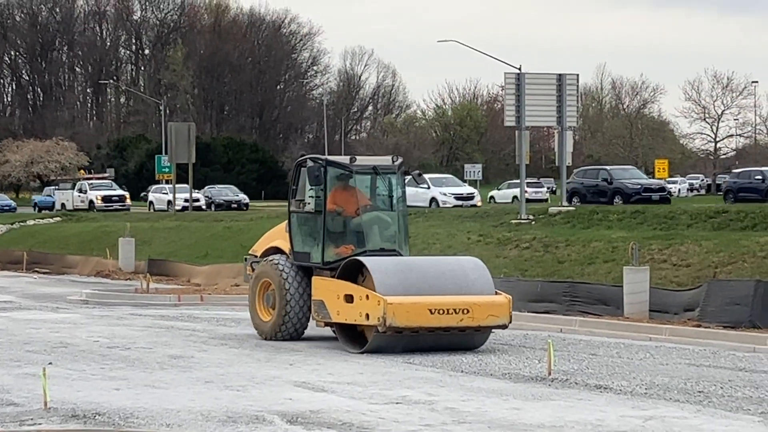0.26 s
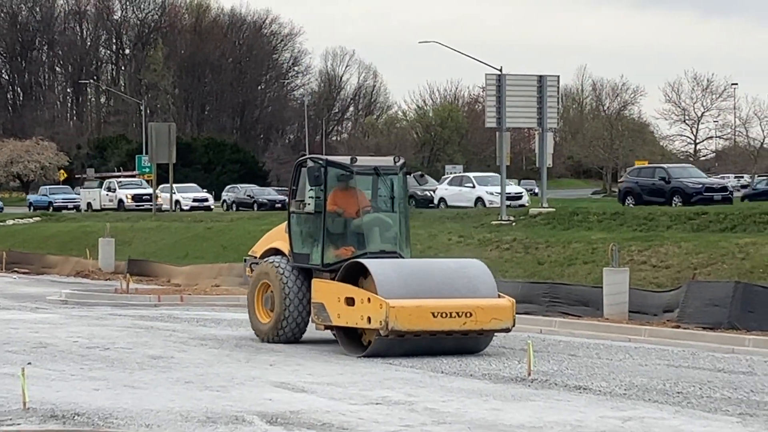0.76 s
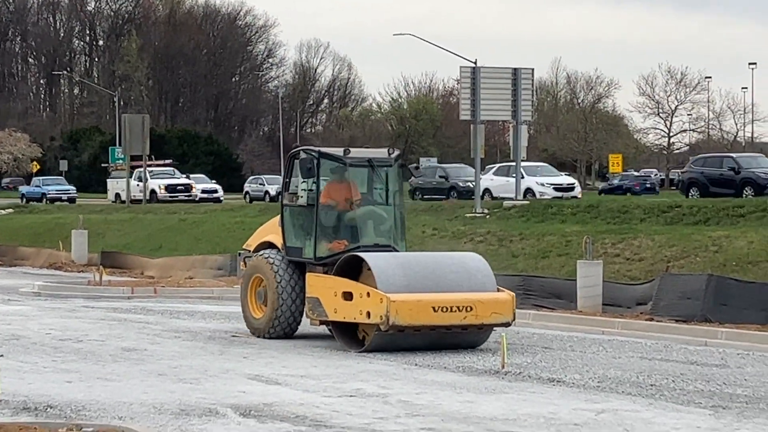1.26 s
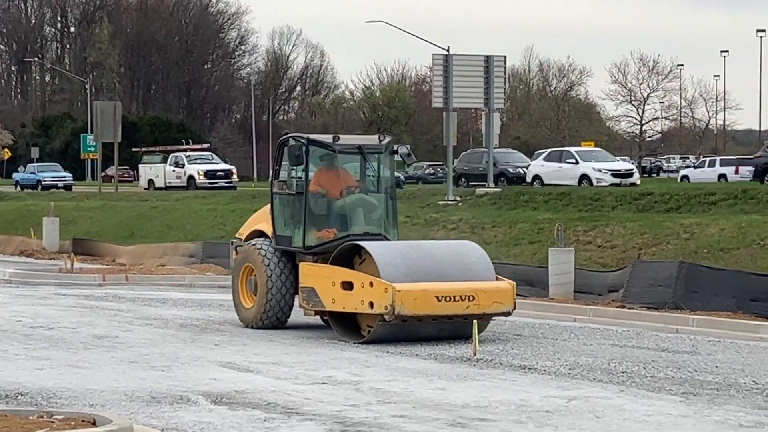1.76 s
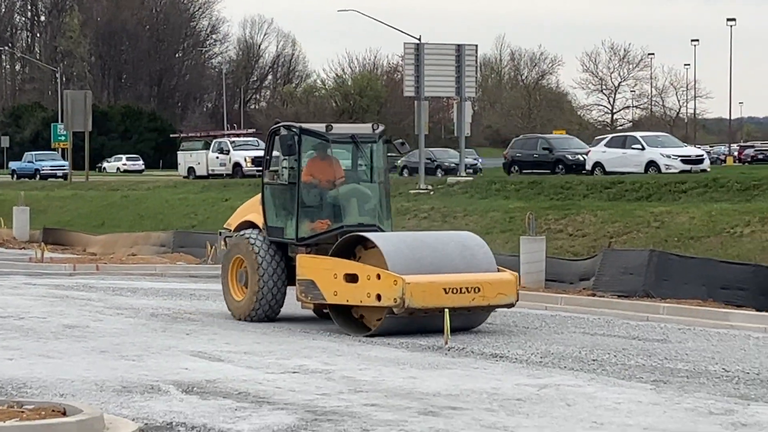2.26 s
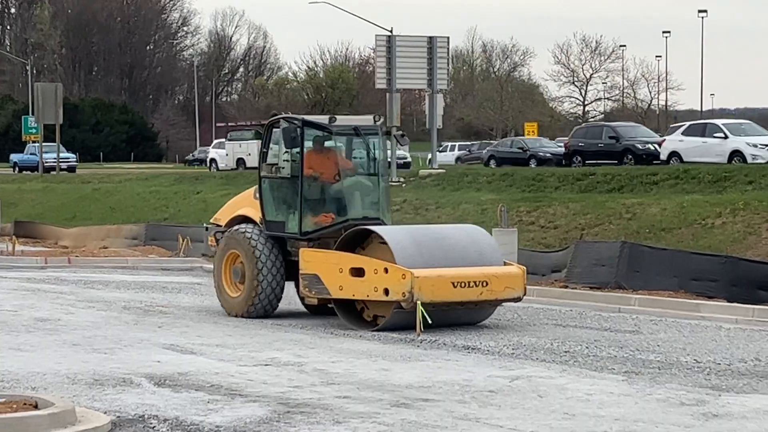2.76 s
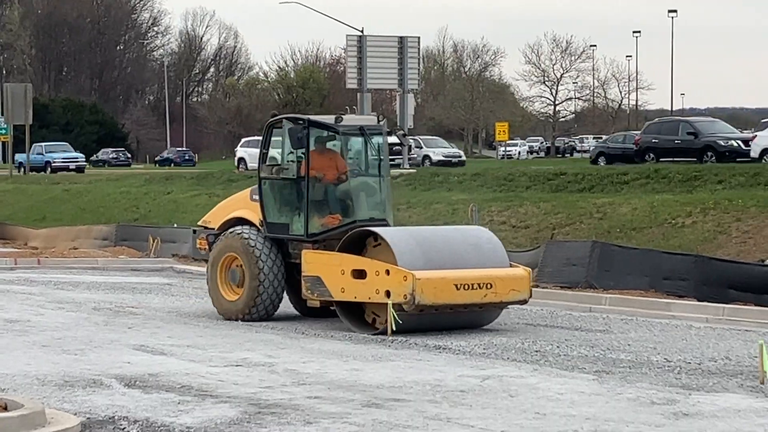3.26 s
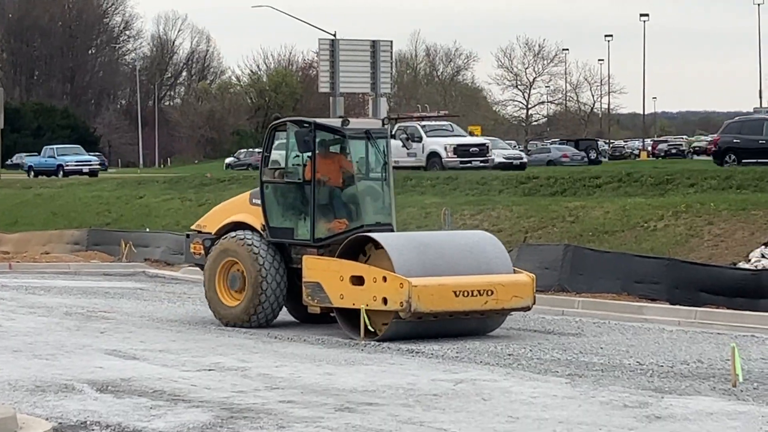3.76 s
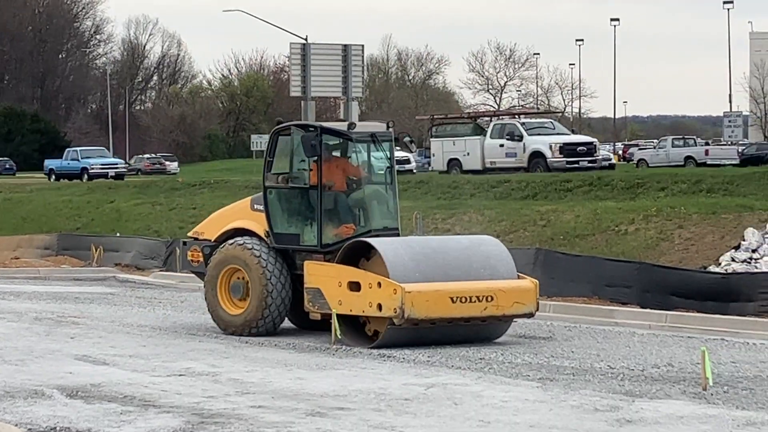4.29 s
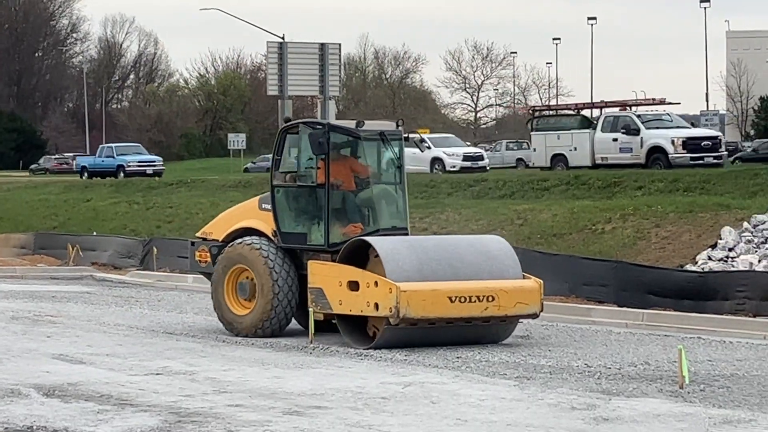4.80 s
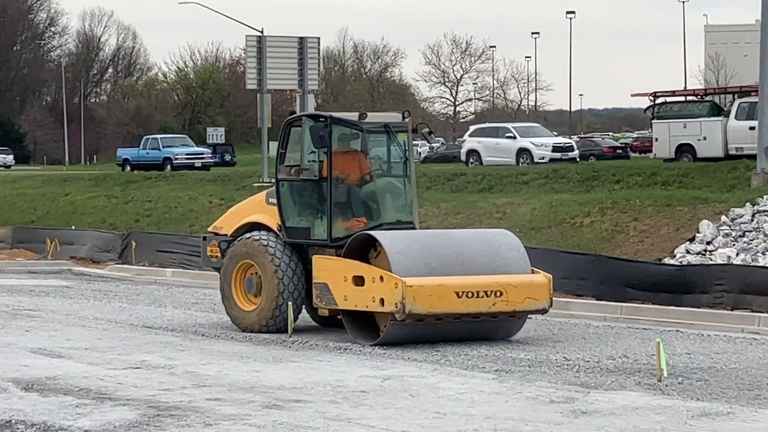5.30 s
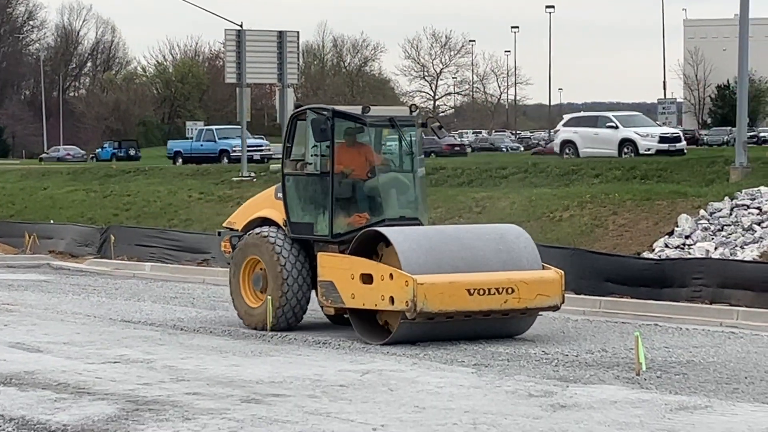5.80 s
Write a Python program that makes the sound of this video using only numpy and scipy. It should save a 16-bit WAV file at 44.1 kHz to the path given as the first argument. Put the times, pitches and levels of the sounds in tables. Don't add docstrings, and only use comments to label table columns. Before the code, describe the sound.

From 0 to 6 seconds a heavy road roller's diesel runs continuously outdoors: low firing hum, rough exhaust roar, dense midrange clatter, and a fan drone that wavers slightly in pitch. Thin hydraulic and gear whines swell and fade over it. Fine gravel crunches constantly under the drum, with loose metal rattling. Low traffic rumble and faint tyre hiss lie behind; a truck's hum is strongest around 0.5 to 2 seconds. Small stones slide and crack near 0.9, then sharp ticks come around 1.4 to 1.7. From about 4 seconds the drone grows fuller, with a dull frame boom at 4.3 and a brief higher ring at 4.5. Brighter whines rise near 4.7, stones snap from 4.7 to 5.3, and low booms follow at 5.35 and 5.7. The roller is nearest around 5.6 as another truck's low hum swells to the end. Handheld phone stereo, open air.

```python
import sys
import numpy as np
from scipy import signal
from scipy.fft import rfft, irfft, next_fast_len
from scipy.io import wavfile

SR = 44100
rng = np.random.default_rng(int(sys.argv[2]) if len(sys.argv) > 2 else 0)


def gain_from_db(level_db):
    decades = np.asarray(level_db, float) / 20
    return 10 ** decades


def pcm_store(signal):
    levels = np.round(np.clip(np.atleast_2d(signal), -1, 1) * 32767)
    wavfile.write(sys.argv[1], SR, levels.astype(np.int16).T)


N = 266364
T_S = np.arange(N) / SR
SIZE = next_fast_len(N + 4096)
HZ = np.maximum(np.arange(SIZE // 2 + 1) * SR / SIZE, 1.)

# f/Hz, density/dB
CLATTER_SPECTRUM = [(520, -6.5), (700, 0), (1000, -2), (1300, -3.5), (1600, -5.5), (1800, -12.5),
                    (2200, -15.5), (3000, -15), (3500, -16.5), (3900, -21.5), (5000, -26)]


def rms_one(x):
    return x / np.sqrt(np.mean(x ** 2) + 1e-20)


def in_time(rows):
    s, *columns = np.transpose(rows)
    return [np.interp(T_S, s, c) for c in columns]


def at_hz(rows, column=1):
    return np.interp(np.log(HZ), np.log(np.array(rows)[:, 0]), np.array(rows)[:, column])


def shape(x, response):
    return irfft(rfft(x, SIZE) * response, SIZE)[..., :N]


def swells(rows, base_db):
    power = gain_from_db(base_db) ** 2
    for s, half_s, db in rows:
        power = power + gain_from_db(db) ** 2 * np.exp(-2 * ((T_S - s) / half_s) ** 2)
    return 10 * np.log10(power)


def drift(rate_hz):
    r = np.exp(-80 * np.pi * rate_hz / SR)
    noise = rng.standard_normal(N // 40 + 2002)
    slow = signal.lfilter([1], [1, -2 * r, r * r], noise)[2000:]
    return np.interp(np.arange(N) / 40, np.arange(len(slow)), rms_one(slow))


def tone(hz, level_db, waver_db, wander_hz):
    turns = np.cumsum(hz + wander_hz * drift(6.19)) / SR + rng.random()
    level = np.sqrt(2) * gain_from_db(level_db + waver_db * drift(3.85))
    return level * np.sin(2 * np.pi * turns)


def patchy(source, spectrum, shared_db, own_db, rate_hz):
    low_hz, high_hz = spectrum[0][0], spectrum[-1][0]
    colour = gain_from_db(at_hz(spectrum)) * (HZ > low_hz) * (HZ < high_hz)
    waves = rfft(source, SIZE) * colour
    together, out = drift(6.2), 0
    for centre in np.arange(np.log2(low_hz), np.log2(high_hz) + .5, .5):
        window = np.cos(np.pi * np.clip(np.log2(HZ) - centre, -.5, .5)) ** 2
        flicker_db = shared_db * together + own_db * drift(rate_hz)
        out = out + gain_from_db(flicker_db) * irfft(waves * window, SIZE)[:, :N]
    return rms_one(out)


def roller_lines(crank_hz, fan_hz, fan_db, firing_db, near_db):
    # multiple of crank rate, level/dB
    engine_orders = [(1.5, -43), (5, -53), (6, -51.5), (10.4, -59.5), (24, -58.5)]
    # multiple of crank rate, level re pump line/dB
    pump_orders = [(54, -19), (72, -22)]
    # t/s, half length/s, level/dB
    pump_surges = [(.3, 0.43, -48), (.8, 0.4, -48.5), (1.2, .1, -45), (1.6, 0.24, -48), (1.95, .1, -47),
                   (2.62, 0.21, -43.5), (3.1, 0.14, -47), (4.35, 0.117, -42.5), (4.8, 0.17, -39.5),
                   (5.75, .15, -50), (6.04, 0.15, -40.5)]
    # t/s, half length/s, level/dB
    pump2_surges = [(1.7, .1, -51), (2.4, 0.11, -57), (4.65, 0.1, -39), (5.1, 0.068, -40.5),
                    (5.4, 0.13, -43.5)]
    # t/s, half length/s, level/dB
    gear_surges = [(1.9, 0.65, -55.5), (3.4, .15, -63), (4.0, 0.13, -55), (4.9, .12, -54),
                   (5.35, 0.13, -51)]
    # t/s, half length/s, level/dB
    order_9_surges = [(2.6, 0.16, -40.5), (4.3, 0.099, -46), (5.4, 0.86, -44.5)]
    order_12_surges = [(.8, 0.16, -46), (1.5, .15, -47.5), (3.33, 0.06, -37), (4.4, .35, -43),
                       (4.85, 0.27, -40), (5.75, .2, -44)]

    pump_db = swells(pump_surges, base_db=-50.5)
    pump2_db = swells(pump2_surges, base_db=-54 + 1.34 * (fan_db + 34))
    gear_db = swells(gear_surges, base_db=-76)
    out = tone(fan_hz, fan_db, waver_db=1.0, wander_hz=0.31)
    out += tone(18 * crank_hz, pump_db, waver_db=2.0, wander_hz=2.52)
    out += tone(36 * crank_hz, pump2_db, waver_db=2.0, wander_hz=5.02)
    out += tone(2 * crank_hz, firing_db, waver_db=0.5, wander_hz=0.37)
    out += tone(63 * crank_hz, gear_db, waver_db=3.5, wander_hz=14.1)
    for multiple, db in engine_orders:
        out += tone(multiple * crank_hz, db + 0.88 * near_db, waver_db=3.5, wander_hz=1.3)
    for multiple, db in pump_orders:
        out += tone(multiple * crank_hz, pump_db + db, waver_db=3.0, wander_hz=.2 * multiple)
    out += tone(9 * crank_hz, swells(order_9_surges, base_db=-57), waver_db=0.5, wander_hz=1.8)
    out += tone(12 * crank_hz, swells(order_12_surges, base_db=-57), waver_db=1.5, wander_hz=2.45)
    return out


def panels():
    # f/Hz, width/Hz, boost/dB
    resonances = [(407, 26.6, 6.5), (467, 20, 5), (563, 14, 0.5), (920, 104, 4), (1088, 66, 6),
                  (1180, 110, 0.5), (1503, 25, 8.5), (2008, 126, 7), (2180, 52, -3), (2462, 68, 8)]
    boost_db = sum(db / (1 + (2 * (HZ - hz) / width_hz) ** 2) for hz, width_hz, db in resonances)
    return gain_from_db(boost_db)


def engine_noise(crank_hz, roar_db, clatter_db):
    # f/Hz, density/dB
    roar_spectrum = [(150, -66), (230, -4.5), (300, 2.5), (335, -3.5), (450, -4), (600, -6), (760, -16)]
    roar = patchy(rng.standard_normal((2, N)), roar_spectrum, shared_db=0.13, own_db=1.0, rate_hz=12)
    puff = 1 + .05 * np.cos(4 * np.pi * np.cumsum(crank_hz) / SR)
    puffed = puff * rng.standard_normal((2, N))
    clatter = patchy(puffed, CLATTER_SPECTRUM, shared_db=0.58, own_db=0.75, rate_hz=22)
    return shape(gain_from_db(roar_db) * roar + gain_from_db(clatter_db + 7) * clatter, panels())


def rattle(clatter_db):
    pitches_hz = np.geomspace(1600, 6000, 36)
    ring_s = .12
    strength = gain_from_db(2.4 * np.minimum(rng.exponential(1, N), 4))
    knocks = strength * (rng.random(N) < 300 * gain_from_db(3 * drift(5)) / SR)
    dealt, out = rng.integers(0, len(pitches_hz), N), np.zeros(N)
    for k, hz in enumerate(pitches_hz):
        r, w = gain_from_db(-60 / (ring_s * SR)), 2 * np.pi * hz / SR
        struck = knocks * (dealt == k) + 1e-18
        out += signal.lfilter([0, np.sin(w)], [1, -2 * r * np.cos(w), r * r], struck)
    return gain_from_db(clatter_db - 6) * rms_one(shape(out, gain_from_db(at_hz(CLATTER_SPECTRUM))))


def low_rumble(rumble_db):
    # f/Hz, density/dB
    rumble_spectrum = [(22, -42), (31, -36), (35, -13), (42, -5.5), (58, -0.5), (85, -3), (130, -4.5),
                       (200, -8.5), (290, -12), (330, -24.5)]
    noise = rng.standard_normal((2, N))
    return gain_from_db(rumble_db - 1) * patchy(noise, rumble_spectrum, shared_db=0.4, own_db=1.5, rate_hz=10)


def traffic_hum():
    # t/s, half length/s, level/dB
    truck_gaps = [(.45, 0.42, -31), (.95, 0.42, -29.5), (1.55, 0.43, -27), (3.05, 0.42, -31),
                  (4.3, 0.56, -34)]
    # t/s, f/Hz, level/dB
    idler_curve = [(0, 76.2, -38.5), (.5, 75.1, -31.5), (1, 75.2, -38.5), (1.8, 75.5, -43),
                   (2.6, 76.2, -37), (3.4, 74.8, -45), (4.2, 75.82, -76), (6.04, 75.47, -61)]
    # t/s, half length/s, level/dB
    arrival_swells = [
        (5.45, 0.17, -36.5),
        (6.04, 0.46, -25),
    ]
    hum = tone(119.8 + 1.0 * T_S, swells(truck_gaps, base_db=-42), waver_db=0.5, wander_hz=1.29)
    hum += tone(*in_time(idler_curve), waver_db=1.0, wander_hz=0.15)
    return hum + tone(116.2, swells(arrival_swells, base_db=-70), waver_db=2.0, wander_hz=0.89)


def tyres():
    # t/s, half length/s, level/dB
    car_passes = [(.2, .4, -61.5), (.7, .4, -64.5), (1.2, 0.34, -69), (1.8, .4, -63), (2.7, 0.11, -63),
                  (3.05, 0.098, -68), (5.2, 0.59, -63), (5.9, .5, -62)]
    # f/Hz, density/dB
    hiss_spectrum = [(3000, -21), (4200, 3), (5500, -1), (6500, -1.5), (8000, -27)]
    hiss = patchy(rng.standard_normal((2, N)), hiss_spectrum, shared_db=-1.8, own_db=3.2, rate_hz=7.3)
    return gain_from_db(swells(car_passes, base_db=-75)) * hiss


def gravel(near_db):
    # f/Hz, density/dB
    gravel_spectrum = [(2500, -23), (4000, -0.5), (5000, -1.5), (6200, -5.5), (8000, -7), (10000, -7.5),
                       (12000, -11), (14000, -16.5), (16000, -16)]
    # t/s, half length/s, level/dB
    slides = [
        (.87, 0.048, -63),
        (1.6, .1, -72),
        (3.75, .1, -70),
    ]
    # t/s, peak/dB, decay/s
    crack_events = [(.860, -52, .001), (.877, -50, .001), (1.3822, -50, .0005), (1.416, -50, .003),
                    (1.423, -50, 0.0036), (1.5198, -41, .0004), (1.655, -50, .0006), (4.7362, -43, .0005),
                    (5.0666, -43, .0005), (5.221, -44, .0005), (5.2624, -42, .0005)]

    sizes = gain_from_db(3.7 * np.minimum(rng.exponential(1, (2, N)), 5)) * rng.choice([-1, 1], (2, N))
    grains = sizes * (rng.random((2, N)) < 1500 * gain_from_db(3 * drift(14)) / SR)
    bed = 0.43 * rms_one(grains) + rng.standard_normal((2, N))
    level_db = swells(slides, base_db=-63.5 + near_db) + 7.5
    crunch = gain_from_db(level_db) * patchy(bed, gravel_spectrum, shared_db=0.0, own_db=1.0, rate_hz=12)

    cracks = np.zeros(N)
    for s, db, decay_s in crack_events:
        burst = rng.choice([-1, 1], 400) * np.exp(-np.arange(400) / SR / decay_s)
        start = round(s * SR)
        cracks[start:start + 400] += gain_from_db(db + 3) * burst
    crack_band = signal.butter(2, [9000, 14000], "band", fs=SR, output="sos")
    crunch[0] += signal.sosfilt(crack_band, cracks)
    return crunch


def booms():
    # t/s, f/Hz, half length/s, level/dB
    drops = [
        (4.3, 405, 0.047, -28),
        (4.5, 1090, .04, -37),
        (5.35, 268, 0.067, -32.5),
        (5.72, 268, 0.083, -31.5),
        (4.3, 290, 0.12, -36),
    ]
    out = 0
    for s, hz, half_s, db in drops:
        out = out + tone(hz, swells([(s, half_s, db)], base_db=-88), waver_db=-1.0, wander_hz=2.92)
    return out


def ports(common, apart):
    # f/Hz, likeness 0-1, right lead/rad, left over right/dB
    port_curve = [(60, .955, 0, -.1), (300, .965, -.1, .1), (600, .7, .13, .4), (1300, .68, .1, 2.5),
                  (1550, .76, 0, 2.2), (1750, .15, .1, 2.8), (2000, .79, .3, 1.3), (3000, .82, -.9, .2),
                  (4000, .76, -2.5, -1.1), (6000, .9, -3.1, -1.3), (6820, .55, 0, 1.0), (8500, .97, 0, 0)]
    alike = np.clip(at_hz(port_curve, column=1), 0, 1)
    mid = np.sqrt((1 + alike) / 2) * rfft(common, SIZE)
    side = np.sqrt((1 - alike) / 2) * rfft(apart, SIZE)
    half_lead = .5 * at_hz(port_curve, column=2) + np.pi * np.maximum(HZ - 6820, 0) / 4540
    turn = np.exp(1j * half_lead) / gain_from_db(.5 * at_hz(port_curve, column=3))
    return irfft([(mid + side) / turn, (mid - side) * turn], SIZE)[:, :N]


def scene():
    # t/s, fan blade f/Hz, fan level/dB (radiator turning), firing level/dB (effort)
    engine_curve = [(0, 308, -35.5, -33), (.45, 306.5, -37.5, -37.5), (.8, 307.8, -37, -39),
                    (1.05, 309, -36.5, -32.5), (1.3, 307.6, -38, -46), (1.65, 305.3, -38, -31),
                    (2.2, 308.4, -37.5, -46), (2.55, 305.5, -39.5, -36), (2.8, 309, -34.5, -38.5),
                    (3.3, 309, -34.5, -35), (4.0, 305.9, -28, -28.5), (4.3, 307.1, -29.5, -30.5),
                    (4.8, 304.5, -30.5, -24), (5.3, 304.9, -31, -30.5), (5.6, 305.9, -31, -27.5),
                    (5.85, 307.5, -35, -38), (6.04, 309.6, -30.5, -51)]
    fan_hz, fan_db, firing_db = in_time(engine_curve)
    crank_hz = fan_hz / 7.825
    effort_db = firing_db + 35
    closest_s, pass_s = 5.63, 2.92
    near_db = 3.0 - 10 * np.log10(1 + ((T_S - closest_s) / pass_s) ** 2)
    roar_db = -37 + .03 * effort_db + 0.4 * near_db
    clatter_db = -46 + 0.046 * effort_db + 0.22 * near_db

    lines = roller_lines(crank_hz, fan_hz, fan_db, firing_db, near_db)
    engine = engine_noise(crank_hz, roar_db, clatter_db)
    loose = rattle(clatter_db)
    rumble = low_rumble(-26 + 0.12 * effort_db)
    hum = traffic_hum()
    common, apart = rumble + engine + gravel(near_db)
    return ports(common + lines + hum + loose, apart) + tyres() + booms()


def roll_off(x):
    return signal.sosfilt(signal.butter(12, 17110, fs=SR, output="sos"), x)


def record(dry):
    mix = shape(dry, HZ < 15750)
    return roll_off(mix)


dry = scene()
out = record(dry)
pcm_store(out)
```